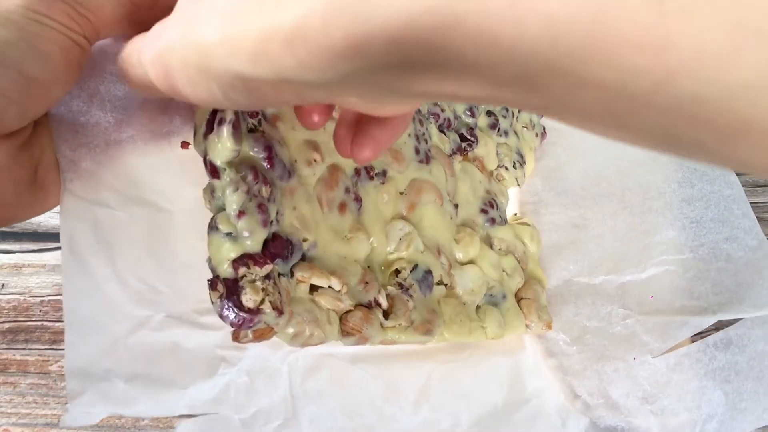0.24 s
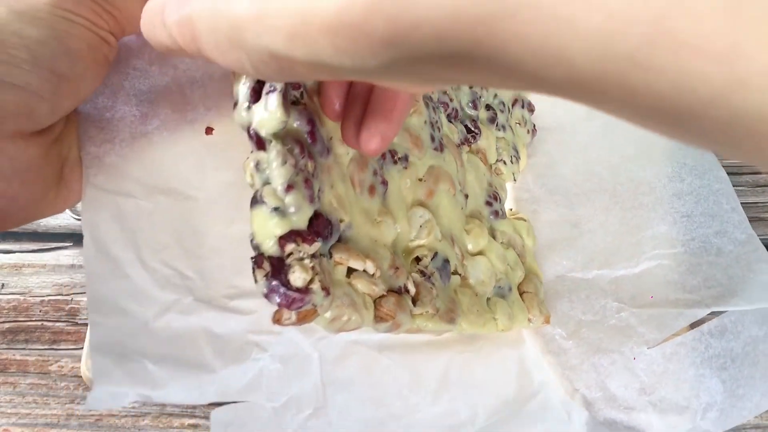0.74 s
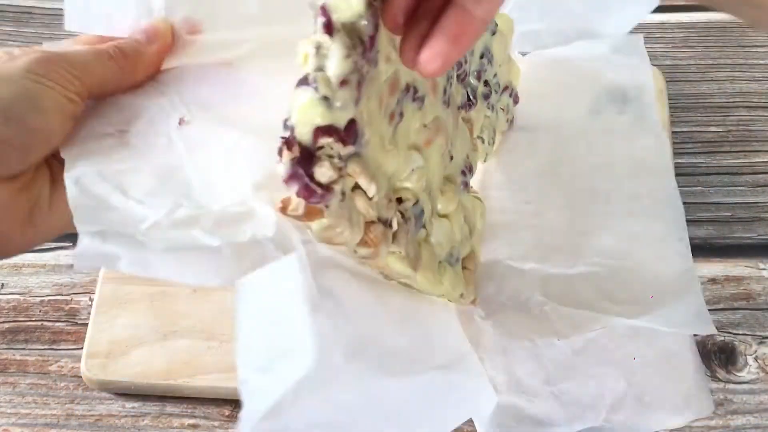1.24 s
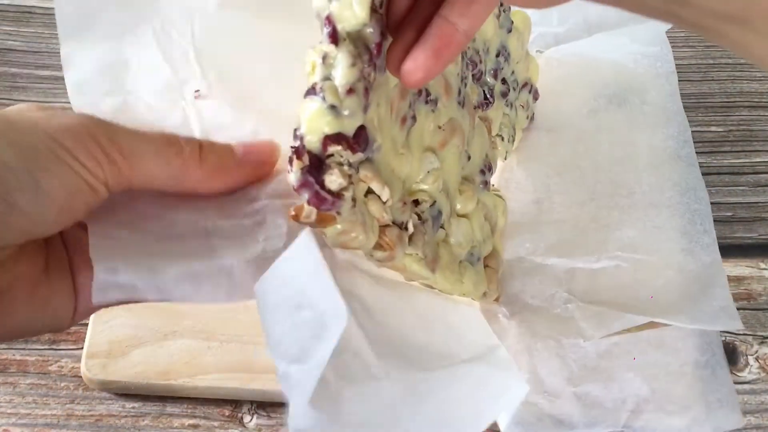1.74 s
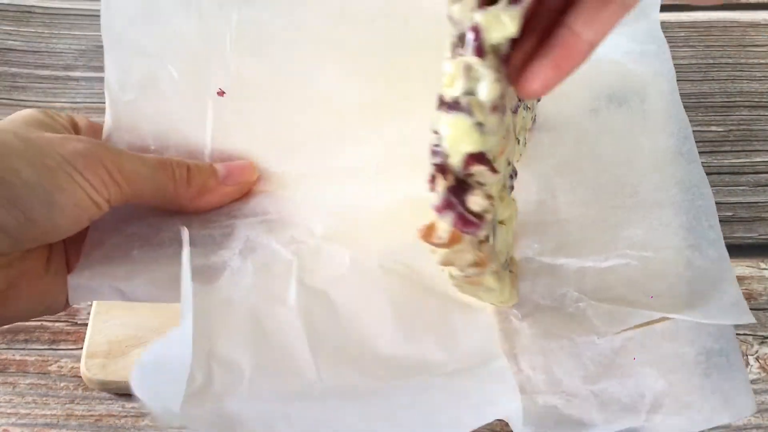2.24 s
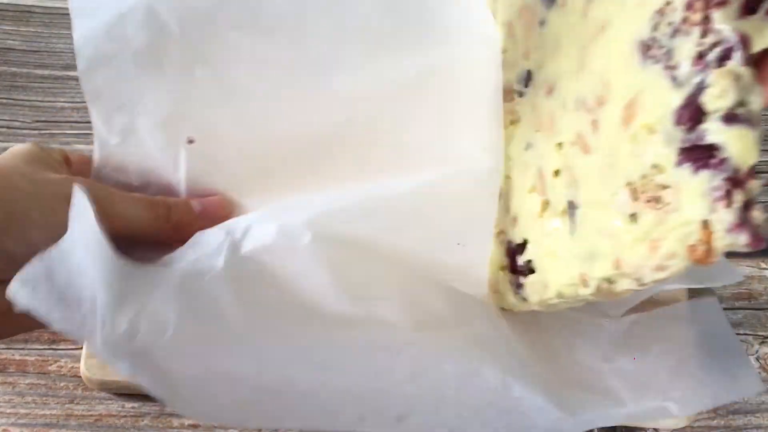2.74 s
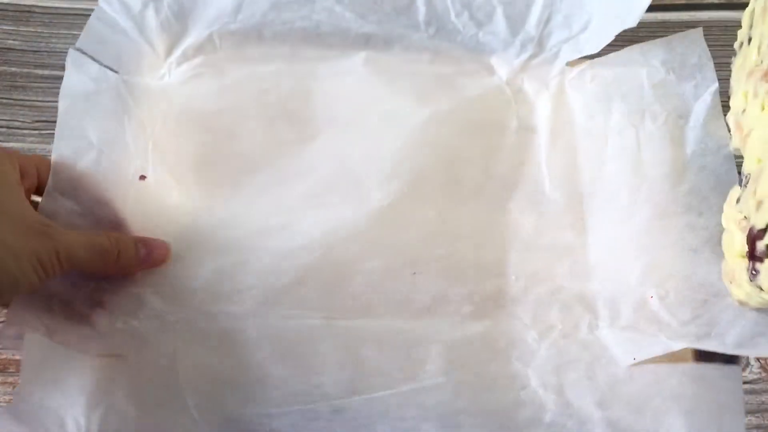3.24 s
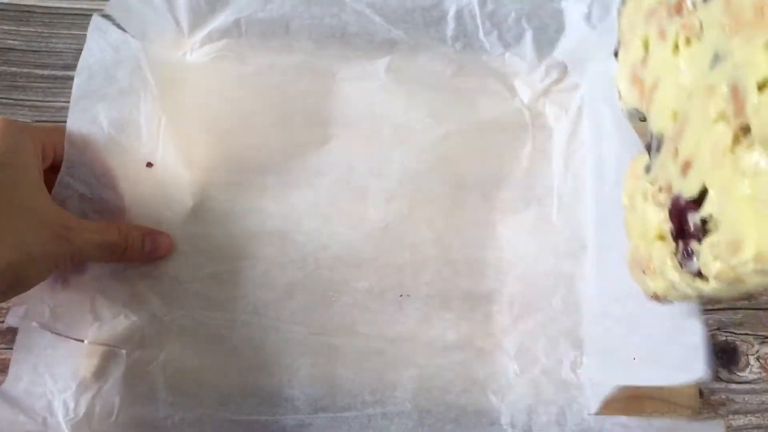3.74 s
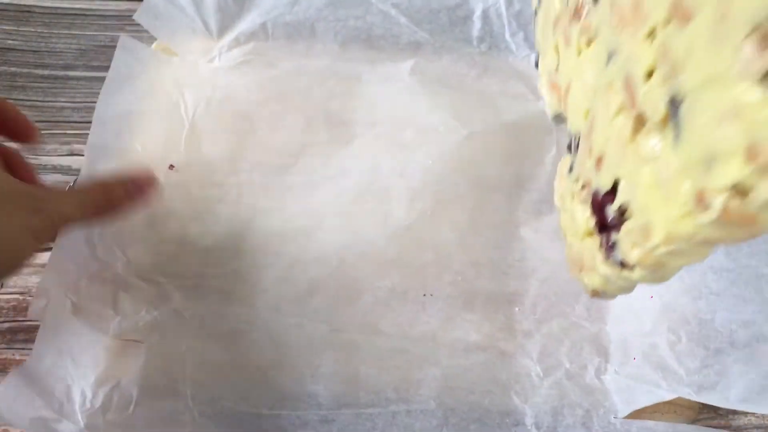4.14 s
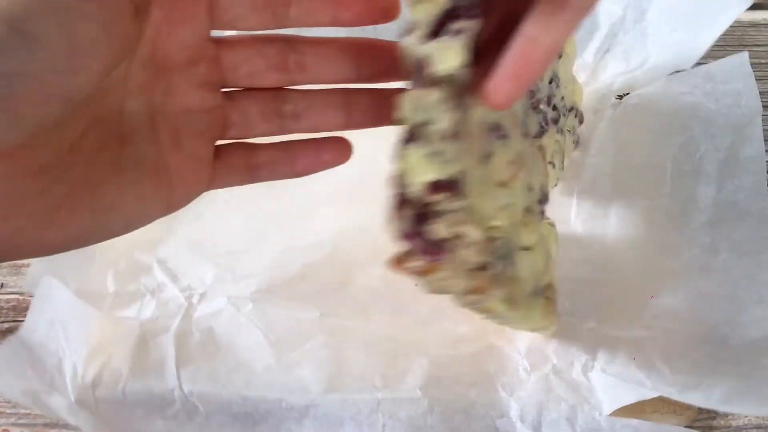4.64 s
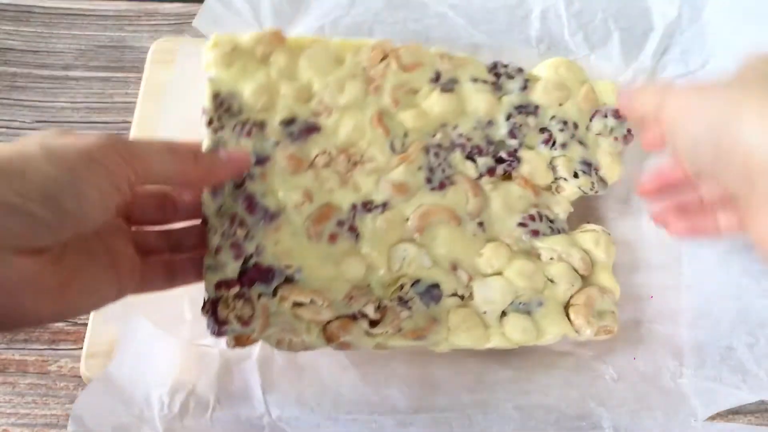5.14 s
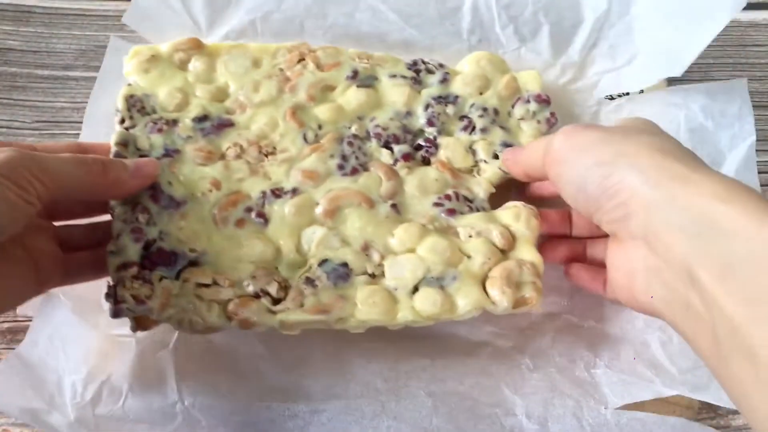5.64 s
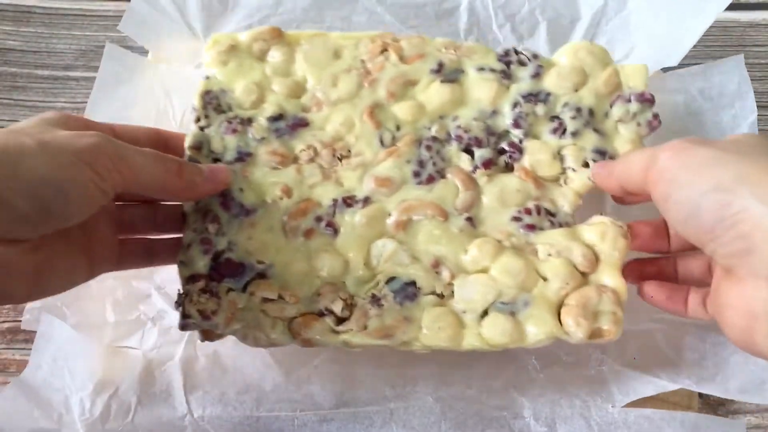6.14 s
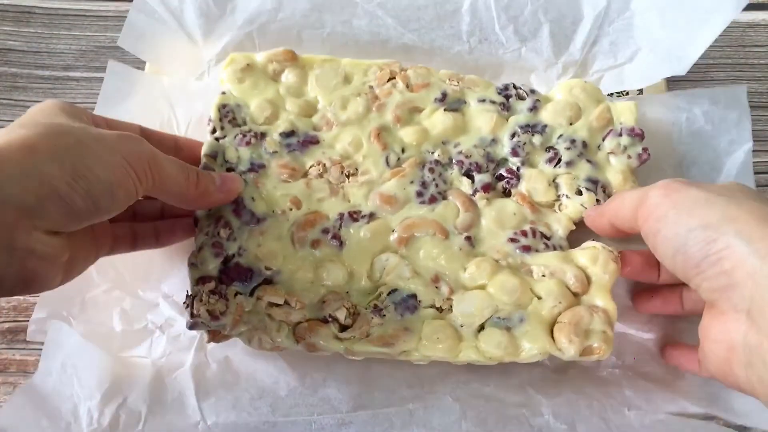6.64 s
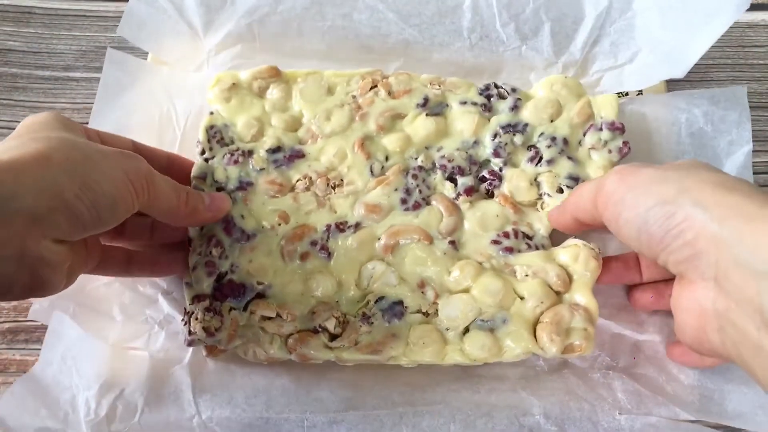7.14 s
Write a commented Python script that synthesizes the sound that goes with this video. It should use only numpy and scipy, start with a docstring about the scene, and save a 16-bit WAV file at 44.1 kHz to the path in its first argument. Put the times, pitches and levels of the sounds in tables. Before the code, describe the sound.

Baking parchment crackles and crinkles sharply as a sticky slab is peeled away, then settles into sparse, faint rustles in a quiet kitchen.

```python
"""A sticky slab is peeled off baking parchment on a wooden board, lifted, turned and laid back, close to a phone.
Creases snap one by one: noise bursts ring briefly at each fold's pitch, crack and stir the air under the sheet.
That air rings near 1.1 kHz. Tiny crackles and hiss make the rustle; smooth slides hiss and the board knocks softly.
A quiet kitchen answers with short tails of noise, over two wavering low hums, a rumble and faint air hiss."""
import sys
import numpy as np
from scipy import signal
from scipy.fft import rfft, irfft, next_fast_len
from scipy.io import wavfile
from scipy.ndimage import map_coordinates

SR = 44100
rng = np.random.default_rng(int(sys.argv[2]) if len(sys.argv) > 2 else 0)


def ratio(d):
    """dB to gain"""
    e = np.asarray(d, float) / 20
    return 10 ** e


def dump(signal):
    """Clip the signal to [-1, 1] and save it as 16-bit WAV at the path in sys.argv[1]."""
    limited = np.clip(np.atleast_2d(signal).T, -1, 1)
    pcm = np.round(limited * 32767).astype(np.int16)
    wavfile.write(sys.argv[1], SR, pcm)


N = 325766  # length in samples

# how the sheet changes from slack under the slab to free:
# t/s, share of the pocket's higher mode (0-1), stiffness as relative treble level/dB
SHEET_STATE = [(0, 0, -27), (1.0, 0.32, -11), (1.3, 0.03, -10), (1.9, 0.21, -21), (2.6, 0.27, -12),
               (3.1, 0.75, 1.5), (3.8, 0.73, -17), (4.5, 0.3, -11.5), (5.5, 0.56, 2.5), (6.6, 0.83, -1),
               (7.39, 1, -7)]


def unit(x):
    """Scales a sound to rms 1."""
    return x / np.sqrt(np.mean(x ** 2) + 1e-20)


def along(points, hz):
    """Reads a value at each frequency from (Hz, value) points on a log axis."""
    f, v = np.transpose(points)
    return np.interp(np.log(hz + 1), np.log(f + 1), v)


def curves(rows):
    """Gives one value per sample for each column after the time."""
    s, *cols = np.transpose(rows)
    return [np.interp(np.arange(N) / SR, s, c) for c in cols]


def wobble(rate):
    """Draws a smooth random curve with rate knots a second."""
    return map_coordinates(rng.standard_normal(N // 100), [np.arange(N) * rate / SR])


def filtered(x, response):
    """Multiplies the spectrum of x by a response, which may be complex."""
    m = next_fast_len(N + 8192)
    return irfft(rfft(x, m) * response(np.fft.rfftfreq(m, 1 / SR)), m)[..., :N]


def resonances(modes):
    """Adds up resonances given as (Hz, width in Hz, dB), with alternating sign; none rings before it is struck."""
    def response(f):
        total = 0
        for k, (c, w, db) in enumerate(modes):
            total = total + (-1) ** k * ratio(db) * 1j * f * w / (c * c - f * f + 1j * f * w)
        return total
    return response


def noise(spectrum):
    """Makes steady noise of rms 1 with the given colour."""
    return unit(filtered(rng.standard_normal(N), lambda hz: ratio(along(spectrum, hz))))


def placed(s, shapes):
    """Adds the rows of shapes together, each starting at its time in seconds."""
    at = np.round(s * SR).astype(int)[:, None] + np.arange(shapes.shape[1])
    return np.bincount(at.ravel(), shapes.ravel(), N + SR)[:N]


def rings(hz, cycles, size):
    """Makes damped sines with a soft start; their decay factor falls to 1/e in the given number of cycles."""
    turn = hz[:, None] * np.arange(size) / SR  # cycles since the start
    return np.sin(2 * np.pi * turn) * np.exp(-turn / cycles) * (1 - np.exp(-turn / 0.17))


def bursts(rise_s, life_s, size, spike=0):
    """Makes one swelling and dying noise burst a row, with an optional sharp first jolt."""
    t = np.arange(size) / SR
    swell = (1 - np.exp(-t / rise_s)) * np.exp(-t / life_s[:, None])
    return rng.standard_normal((len(life_s), size)) * swell + spike * (t == 0)


def creases(hz, excite, cycles):
    """Lets each burst ring its own patch of paper; rows have peak 1."""
    size = excite.shape[1]
    rows = signal.fftconvolve(excite, rings(hz, cycles, size=size), axes=1)[:, :size]
    return rows / (np.abs(rows).max(1, keepdims=True) + 1e-9)


def hum_line(hz, waver_hz):
    """Makes one low hum whose pitch and level waver at random."""
    phase = 2 * np.pi * np.cumsum(hz + waver_hz * wobble(8.4)) / SR
    return np.sqrt(2) * ratio(2.1 * wobble(4.9)) * np.sin(phase)


def background():
    """Mixes two wavering hums and a rumble coloured by room modes over faint air hiss."""
    # the middle levels of the upper hum and rumble: t/s, hum level/dB, rumble level/dB
    hum_levels = [(0.0, -63, -56.5), (2.18, -57, -58.5), (2.3, -59, -52), (2.88, -54.5, -59.5),
                  (3.17, -77, -75), (3.58, -60.5, -76.5), (5.18, -62.5, -60.5), (5.22, -55, -60),
                  (5.88, -63, -66), (6.11, -91.5, -63), (6.34, -58, -59.5), (6.97, -48.5, -62.5),
                  (7.39, -62, -68)]
    # room modes in the rumble: f/Hz, width/Hz, relative level/dB
    room_modes = [(155.3, 53, -5), (216, 25, -3), (288.7, 27, -6)]
    # colour of the air hiss: f/Hz, relative level/dB
    air_colour = [(25, -15.5), (70, -3), (175, -4.5), (363, -14.5), (3720, -31.5), (10400, -38),
                  (16000, -50)]
    hum_db, rumble_db = curves(hum_levels)
    # the lower hum half follows the upper and climbs at the end
    climb_start_s, climb_db_per_s = 6.64, 19
    climb_db = climb_db_per_s * np.clip(np.arange(N) / SR - climb_start_s, 0, None)
    low_db = -64.5 + 0.5 * (hum_db - hum_db.mean()) + climb_db
    room = resonances(room_modes)
    rumble = unit(filtered(rng.standard_normal(N), lambda f: room(f) / (1 + (f / 330) ** 4)))
    hums = ratio(hum_db) * hum_line(81, waver_hz=0.56) + ratio(low_db) * hum_line(61, waver_hz=2.2)
    return hums + ratio(rumble_db + 3.4 * wobble(7)) * rumble + ratio(-62.5) * noise(air_colour)


def effort():
    """Gives relative rustle and pocket levels in dB: each pull on the sheet swells to a peak and fades."""
    # pulls and pushes; rise and fade each span 20 dB:
    # peak t/s, rise/s, fade/s, relative rustle level/dB, pocket level over rustle/dB
    pulls = [(0.299, .08, .13, -47.5, -3), (0.619, 0.04, 0.14, -48.5, -7), (0.901, 0.39, 0.4, -62.5, 10),
             (1.11, 0.0072, 0.2, -31.5, 4), (1.165, 0.047, 0.14, -25, 0.5), (1.399, 0.22, 0.3, -45.5, -0.5),
             (1.81, 0.15, 0.18, -42.5, 0.5), (1.951, .1, .2, -46, 5), (2.07, .035, 0.099, -38.5, -14),
             (2.164, .12, .04, -33.5, 5), (2.238, 0.054, .08, -35, 1), (2.359, 0.054, 0.1, -36, 3),
             (2.471, .08, .1, -34.5, 8), (2.57, .1, .1, -39.5, -2), (2.789, 0.044, .08, -33, 2.5),
             (2.85, .08, .11, -25.5, 2.5), (2.98, 0.11, .24, -41.5, 0), (3.351, .1, 0.14, -52.5, 0),
             (3.621, 0.43, 0.13, -51, -5), (3.76, 0.14, .3, -57, -2), (4.16, 0.12, 0.057, -66, 5),
             (4.545, .02, 0.17, -59, 5), (4.724, .05, 0.089, -52.5, -0.5), (4.94, .13, .12, -61, 5.5),
             (5.1, 0.19, .15, -64.5, 5.5), (5.351, .2, 0.29, -55, 7.5), (5.551, 0.23, 0.19, -53, 3),
             (5.701, .05, 0.064, -56, 4), (5.839, .06, 0.12, -66, 3), (6.459, 0.046, 0.093, -59, 8.5),
             (6.57, .1, .3, -53.5, -0.5), (6.85, .13, .08, -45, 0), (6.97, .07, .2, -49, -3),
             (7.21, .05, .13, -59, -8), (7.39, .04, .1, -45, -8.5)]
    rise_rounding, fade_rounding = 1.68, 1.6  # 1 = a pointed swell, 2 = a bell
    still_db = -76.5  # the sheet at rest, on the same scale as the pulls
    s, rise, fade, db, pocket_db = np.transpose(pulls)[:, :, None]
    t = np.arange(0, N + 64, 64) / SR
    before = np.abs((s - t) / rise) ** rise_rounding
    after = np.abs((t - s) / fade) ** fade_rounding
    power = ratio(db - 20 * np.where(t < s, before, after)) ** 2
    sums = power.sum(0), (power * ratio(pocket_db) ** 2).sum(0)
    return [np.interp(np.arange(N) / SR, t, 10 * np.log10(p + ratio(still_db) ** 2)) for p in sums]


def crackle(count, spread_db):
    """Scatters tiny creases of random pitch, a few much larger than the rest, and makes their level flutter."""
    when, size, life, pitch = rng.random((count, 4)).T
    jolts = bursts(0.0015, 0.0012 * (0.2 + life), size=200, spike=1.7)
    rows = creases(900 * 14 ** pitch, jolts, cycles=1.73)
    gain = ratio(-spread_db * np.log(size + .02))
    swarm = placed(when * N / SR, gain[:, None] * rows)
    # flatten the average spectrum so that the sheet alone sets the colour
    power = signal.welch(swarm, SR, nperseg=256)
    flat = filtered(swarm, lambda hz: np.interp(hz, *power) ** -.5)
    return unit(ratio(2.0 * wobble(60)) * flat)


def pocket(x):
    """Rings the air under the sheet in two modes, their balance shifting as the sheet flexes."""
    # the two modes, lower one first: f/Hz, width/Hz, relative level/dB
    pocket_modes = [(976, 301, 5), (1185, 234, 8.5)]
    share = np.clip(curves(SHEET_STATE)[0] + 0.13 * wobble(25), 0, 1)
    low, high = (filtered(x, resonances([mode])) for mode in pocket_modes)
    return np.sqrt(1 - share) * low - np.sqrt(share) * high


def rustle():
    """Crackles and hiss take the sheet's colour and stir the pocket; hard crushing also shakes the board."""
    # colour of the sheet: f/Hz, relative level/dB
    sheet_colour = [(800, -41), (1400, -11), (4120, -9.5), (9060, -15.5), (13000, -21.5), (16000, -38.5)]
    # colour of the shaken board: f/Hz, relative level/dB
    board_colour = [(90, -17.5), (200, -9), (430, -2), (750, -13.5), (1500, -38.5)]
    level_db, pocket_db = effort()
    # stiffer paper and harder pulls bring more treble
    bright_db = curves(SHEET_STATE)[1] + 0.1362 * (level_db + 48)
    hiss = ratio(2.3 * wobble(30)) * rng.standard_normal(N)
    stir = crackle(count=6000, spread_db=5.0) + 0.5 * hiss
    sheet = unit(filtered(stir, lambda hz: ratio(along(sheet_colour, hz))))
    treble = filtered(sheet, lambda hz: hz ** 2 / (hz ** 2 + 7000 ** 2))
    paper = sheet - treble + ratio(bright_db) * treble
    # large areas move more smoothly than single creases
    broad = .9 * stir + ratio(3.8 * wobble(40)) * rng.standard_normal(N)
    board = unit(filtered(broad, lambda hz: ratio(along(board_colour, hz))))
    air = ratio(pocket_db) * unit(pocket(broad))
    return ratio(level_db + 3.0) * paper + air + ratio(1.055 * level_db - 7.5) * board


def slide_hiss(hz):
    """Makes even friction noise of rms 1 in a broad band around hz."""
    band = resonances([(hz, .9 * hz, 0)])
    return unit(filtered(rng.standard_normal(N), lambda f: band(f) ** 2))


def slides():
    """Lets friction hiss swell and fade as the sheet slides smoothly over itself."""
    # the slides: middle t/s, length/s (from the middle to 1/e), level/dB, centre f/Hz
    slide_list = [(0.23, 0.0098, -56, 3440), (0.318, 0.027, -52, 3500), (0.99, 0.19, -59, 2950),
                  (3.085, 0.092, -44.5, 4200), (3.357, 0.025, -50, 3480), (3.952, 0.23, -66.5, 3000),
                  (4.933, 0.077, -51.5, 3320)]
    t = np.arange(N) / SR
    total = 0
    for s, length, db, hz in slide_list:
        total = total + ratio(db) * np.exp(-((t - s) / length) ** 2) * slide_hiss(hz)
    return total


def lesser_snaps(count):
    """Draws smaller snaps at random moments: louder, but slightly rarer, when the sheet is pulled hard."""
    level_db = effort()[0]
    busy = np.cumsum(ratio(-0.11 * level_db))
    at = np.interp(rng.random(count), busy / busy[-1], np.arange(N))
    size, pitch, crack, push = rng.standard_normal((count, 4)).T
    s = np.clip(at / SR, .01, 8)
    db = level_db[at.astype(int)] + 6 + 8 * size
    hz = np.clip(3000 * 1.6 ** pitch, 1400, 9000)
    return np.transpose([s, db, hz, -24 + 6 * crack, -13 + 7 * push])


def snaps():
    """A buckling crease rings a few cycles at its pitch, cracks in the treble and drives the pocket."""
    # the main snaps: t/s, relative level/dB, pitch f/Hz,
    # crack level relative to the snap/dB, pocket push relative to the snap/dB
    main_snaps = [(0.2593, -12, 5030, -37, -20), (0.2808, -13.5, 3100, -22.5, -34),
                  (0.2858, -15.5, 3730, -25.5, -26), (0.3424, -27.5, 3490, -22, -17),
                  (0.356, -24.5, 5230, -25.5, -20), (0.5881, -23, 1740, -24.5, -24),
                  (0.6042, -21, 2920, -27, -20), (0.6204, -20.5, 1860, -24.5, -13.5),
                  (0.6449, -17, 3780, -23.5, -38), (0.6544, -20, 6180, -22.5, -21.5),
                  (0.6674, -16.5, 1740, -23.5, -22), (0.6898, -24, 2600, -21, -21),
                  (0.7013, -16, 1650, -52.5, -18), (0.7134, -27, 2720, -39, -15),
                  (0.7253, -30, 1900, -40, -30), (0.789, -30.5, 1770, -25, -6),
                  (0.7936, -23.5, 1940, -23, -10), (0.828, -14.5, 3000, -38.5, -38),
                  (0.8535, -16.5, 3400, -39.5, -12), (0.8974, -25.5, 2050, -20, -9),
                  (0.9577, -10.5, 2960, -58.5, -40), (1.0385, -29, 3080, -19, -16),
                  (1.0518, -26, 3200, -29.5, -11), (1.0984, -26, 2540, -11, -9),
                  (1.1084, -15.5, 1700, -17, -16), (1.1313, -8.5, 2030, -18.5, -15),
                  (1.1404, -8.5, 1840, -22, -25), (1.1513, -7.5, 2050, -20, -17),
                  (1.1607, -9.5, 2470, -17.5, -11.5), (1.1744, -13.5, 1850, -18.5, -9),
                  (1.1887, -21.5, 2665, -14.5, -10.5), (1.1938, -13, 1950, -17.5, -11),
                  (1.2161, -14, 2200, -14.5, -25), (1.2466, -20, 3110, -20, -17),
                  (1.2775, -12.5, 5300, -13, -2.5), (1.2973, -25, 2005, -14, -10),
                  (1.3219, -22, 4200, -12.5, -14), (1.3453, -22, 4280, -14.5, -12.5),
                  (1.3658, -27.5, 1510, -20, -11), (1.399, -23.5, 2850, -20.5, -2),
                  (1.412, -26, 3470, -13, -12.5), (1.4431, -32.5, 2920, -27, -17.5),
                  (1.4721, -29, 3450, -28.5, -30), (1.485, -26, 1800, -11.5, -6),
                  (1.564, -30.5, 1980, -19.5, -16), (1.5745, -27, 2210, -27.5, -7.5),
                  (1.6252, -25, 3330, -33, -14), (1.6399, -33, 2730, -14.5, -4),
                  (1.6726, -18, 1730, -19, -11), (1.699, -26, 3480, -25.5, -7),
                  (1.7326, -31.5, 3410, -18, -9), (1.7474, -17.5, 3200, -18, -10),
                  (1.7729, -19, 2680, -23, -22), (1.7878, -14, 2980, -22.5, -19.5),
                  (1.8054, -18.5, 3210, -15, -18), (1.8108, -17, 3670, -20.5, -7.5),
                  (1.8384, -27.5, 4340, -10.5, -11), (1.8437, -16.5, 2780, -19.5, -19.5),
                  (1.8583, -20, 2930, -26, -7), (1.8746, -15, 1840, -18.5, -11),
                  (1.8914, -19.5, 1620, -22, -10), (1.9083, -21.5, 2920, -12.5, -2),
                  (1.928, -11, 3350, -20, 1.5), (1.945, -11.5, 3500, -18, -14),
                  (2.0033, -25.5, 3450, -26.5, -0.5), (2.0203, -26.5, 3220, -26, -6.5),
                  (2.042, -25.5, 3300, -8, 1), (2.0492, -10.5, 3320, -18, -6),
                  (2.0664, -24, 8500, -17, -27), (2.0747, -11.5, 4300, -17.5, -20.5),
                  (2.0867, -12, 3380, -15.5, -8), (2.0941, -16, 3220, -17.5, -13),
                  (2.1136, -12, 3245, -16, -21), (2.1271, -15.5, 2415, -12, -13),
                  (2.1725, -14, 2380, -14, -15), (2.1812, -14.5, 2270, -15, -7),
                  (2.2188, -12, 3660, -13.5, 2), (2.231, -22, 3680, -7, -14),
                  (2.2448, -12.5, 2680, -19, -8), (2.2618, -16.5, 4380, -9, -3),
                  (2.2674, -15, 2410, -18, -0.5), (2.2967, -21.5, 2180, -15, -3),
                  (2.3201, -23.5, 1650, -16, -4), (2.3401, -13.5, 3150, -19, -15),
                  (2.3764, -17.5, 1600, -14, -4), (2.385, -14, 2595, -13, -4), (2.4139, -9, 4470, -21, -6),
                  (2.4364, -18.5, 2960, -20.5, -4), (2.4483, -18.5, 2390, -12.5, -8.5),
                  (2.4765, -12.5, 1500, -25, -7), (2.4902, -20, 1630, -19, -5),
                  (2.5067, -13.5, 5380, -22, -5), (2.5167, -16, 5570, -21, -8),
                  (2.5374, -22, 2306, -17.5, -5.5), (2.5647, -21.5, 2430, -17, -5),
                  (2.5895, -30, 2920, -17.5, -14.5), (2.6179, -22.5, 6470, -18.5, -25),
                  (2.6349, -22.5, 1700, -15, -8), (2.6512, -21, 1630, -21.5, -18),
                  (2.6618, -20, 5850, -20.5, -17), (2.6863, -10, 7810, -18.5, -11),
                  (2.7227, -31.5, 1850, -13, 0), (2.7372, -12, 1550, -21.5, -10.5),
                  (2.7424, -18, 3160, -14.5, -19), (2.7671, -18, 3420, -17, -20),
                  (2.7886, -14.5, 1600, -22, -28), (2.81, -17, 1530, -16, -14),
                  (2.8211, -6.5, 1520, -24, -15.5), (2.8374, -6.5, 3260, -28.5, -17),
                  (2.845, -14, 1550, -22.5, -8), (2.8696, -13, 4200, -21, -3),
                  (2.8814, -4, 3080, -24, -8.5), (2.9006, -12.5, 5760, -25, -13),
                  (2.9133, -10, 1624, -18, -10), (3.0494, -30.5, 1500, -15.5, -12),
                  (3.0899, -16.5, 5790, -17, -38), (3.1812, -28.5, 2800, -24.5, -25),
                  (3.2208, -40.5, 4540, -10, -25), (3.2854, -25.5, 2800, -12.5, -32),
                  (3.3054, -28, 4030, -23.5, -22), (3.3189, -10.5, 4090, -30.5, -49),
                  (3.359, -31, 4020, -15, -25), (3.4331, -25, 2770, -13, -26),
                  (3.4665, -20, 3850, -17.5, -41), (3.4852, -19, 3870, -22, -38),
                  (3.5189, -21.5, 6420, -20, -27), (3.5404, -20, 2780, -22.5, -18.5),
                  (3.5688, -28.5, 2870, -16, -5), (3.5852, -27, 3140, -11.5, -20),
                  (3.5936, -26.5, 3540, -20, -19), (3.6221, -21, 2720, -17.5, -23),
                  (3.6277, -19.5, 5200, -16.5, -9.5), (3.6502, -32, 1780, -14, -23),
                  (3.71, -37, 3400, -8, -18), (3.7519, -22, 2870, -28, -28), (3.7703, -26.5, 4700, -19, -9),
                  (3.8656, -33, 3140, -25.5, -27), (4.146, -25, 2130, -50, -5),
                  (4.3011, -34.5, 3250, -19, -7.5), (4.5296, -42, 5400, -21, -8),
                  (4.5437, -33, 5890, -17, -5), (4.5658, -29, 6700, -16, -6.5),
                  (4.7097, -24.5, 6160, -12.5, -32), (4.7341, -27, 3930, -17, -20),
                  (4.9072, -24, 3170, -25, -21), (5.0704, -31.5, 3870, -11.5, -3),
                  (5.1158, -28.5, 1630, -29, -14.5), (5.1906, -37.5, 1590, -15, -1),
                  (5.2205, -24.5, 6390, -19, -15), (5.2445, -34, 3700, -14, -6),
                  (5.2665, -36, 3870, -9, -10), (5.3163, -34.5, 1820, -14.5, -5),
                  (5.3358, -35, 3260, -2.5, 4), (5.426, -30, 1600, -21, -17), (5.4884, -28, 1780, -19, -22),
                  (5.5009, -27, 3040, -15.5, -21), (5.512, -30, 1770, -16, -8),
                  (5.5272, -28, 5700, -16, -17), (5.5533, -28.5, 1980, -14.5, -2),
                  (5.574, -26, 6350, -15.5, -20), (5.656, -31, 5360, -19.5, -19),
                  (5.6955, -36, 3740, -15, -1), (5.7034, -32, 3870, -14.5, -4),
                  (5.8351, -33.5, 5600, -16.5, -13.5), (6.4108, -36, 4600, -24.5, -24),
                  (6.4562, -30.5, 8930, -19, -6), (6.4817, -32.5, 3050, -17, -3),
                  (6.4943, -34, 3400, -10.5, -24), (6.5505, -27.5, 1810, -8.5, -1),
                  (6.5626, -28.5, 2090, -16, -9), (6.5909, -27.5, 5570, -15.5, -13),
                  (6.6323, -29.5, 3470, -8.5, -5), (6.6684, -29.5, 5940, -14, -21),
                  (6.6956, -26.5, 2250, -17, -4.5), (6.7231, -20, 5770, -25.5, -15),
                  (6.7555, -23.5, 6360, -17.5, -21), (6.7644, -26.5, 4080, -18.5, -31),
                  (6.776, -29, 5330, -18.5, -15), (6.7945, -29.5, 3910, -6.5, -12),
                  (6.8259, -18, 3980, -13, -28), (6.8533, -21, 3780, -14, -18),
                  (6.9446, -20, 5270, -14, -14), (6.9579, -20.5, 3630, -17, -9),
                  (7.0953, -32, 2470, -20, -12), (7.1995, -24, 2850, -15.5, -23),
                  (7.2148, -32, 6090, -15, -14.5), (7.3637, -28.5, 6600, -12.5, -19)]
    s, db, hz, crack_db, pocket_db = np.vstack([main_snaps, lesser_snaps(count=70)]).T
    life = np.exp(0.24 * rng.standard_normal(len(s)))
    body = creases(hz, bursts(0.00015, .0013 * life, size=400, spike=3.5), cycles=1.15)
    crack = bursts(0.00049, 0.0015 * life, size=400)
    push = bursts(0.00033, 0.0016 * life, size=400)
    # a short reversed noise swell leads into each snap, stronger in bright ones
    early = s - 300 / SR
    lead_in = creases(hz, bursts(0.00043, 0.00087 * life, size=300), cycles=0.77)[:, ::-1]
    treble_lead_in = bursts(0.00054, 0.0011 * life, size=300)[:, ::-1]
    folds = placed(s, ratio(db - 5.5)[:, None] * body)
    folds += placed(early, ratio(db + crack_db)[:, None] * lead_in)
    bright = placed(s, ratio(db + crack_db + 18.5)[:, None] * crack)
    bright += placed(early, ratio(db + crack_db + 3.5)[:, None] * treble_lead_in)
    # a small fold sends out little bass
    thin_folds = filtered(folds, lambda f: (1j * f / (900 + 1j * f)) ** 3)
    edge = resonances([(8200, 34000, 0.0067)])
    treble = filtered(bright, lambda f: edge(f) / (1 + 1j * f / 9000) / (1 + 1j * f / 15000))
    air = pocket(placed(s, ratio(db + pocket_db + 15.5)[:, None] * push))
    return thin_folds + treble + air


def knocks():
    """Slab and fingers thump the board: low, short rings with an overtone and a deep push."""
    # soft knocks: t/s, relative level/dB, pitch f/Hz
    board_knocks = [(0.282, -31, 554), (0.851, -38, 750), (1.277, -22.5, 486), (1.926, -39, 770),
                    (3.628, -36, 375), (4.568, -29.5, 510), (4.735, -39, 290)]
    s, db, hz = np.transpose(board_knocks)
    soft = 1 - np.exp(-np.arange(1500) / SR / 0.00039)
    thump = rings(hz, 0.83, size=1500)
    thump += 0.55 * rings(1.4 * hz, 1.07, size=1500)  # overtone
    thump += 0.21 * rings(0.31 * hz, 0.69, size=1500)  # deep push
    return placed(s, ratio(db + 5.5)[:, None] * soft * thump)


def kitchen(x):
    """Each frequency of the room's answer dies at its own speed; every third of a second gets its own tail."""
    # how long the room rings: f/Hz, time to fade by 60 dB/s
    fade_times = [(500, 0.2), (2000, 0.071), (10000, 0.074)]
    out, step = np.zeros(N + SR), SR // 3
    for at in range(0, N, step):
        hz, t, z = signal.stft(rng.standard_normal(SR // 3), SR, nperseg=256)
        fading = ratio(-60 * t / along(fade_times, hz)[:, None])
        tail = signal.istft(z * fading, SR, nperseg=256)[1]
        wet = signal.fftconvolve(x[at:at + step], tail / np.linalg.norm(tail))
        out[at + 130:][:len(wet)] += wet  # the answer starts 130 samples (3 ms) late
    return out[:N]


def scene():
    """Mixes paper and board near the microphone, a little room and the background."""
    near = snaps() + knocks() + rustle() + slides()
    return (near + ratio(-13.0) * kitchen(near) + background())[None]


def band_limit(x):
    """A steep low-pass at the top of the band."""
    return signal.sosfilt(signal.butter(12, 16960, fs=SR, output="sos"), x)


def record(dry):
    """The phone cuts the deepest bass, has two dips and keeps little above its band limit."""
    # dips of the microphone housing: f/Hz, width/Hz, depth (0-1)
    housing_dips = [(4810, 420, 0.46), (10500, 310, 0.6)]

    def colour(f):
        gain = 1
        for c, w, depth in housing_dips:
            gain = gain - depth * 1j * f * w / (c * c - f * f + 1j * f * w)
        bass_cut = f ** 4 / (f ** 4 + 42 ** 4)
        return gain * bass_cut * np.where(f < 15900, 1, ratio(-40.5))

    mix = filtered(dry, colour)
    return band_limit(mix)


dry = scene()
out = record(dry)
dump(out)
```